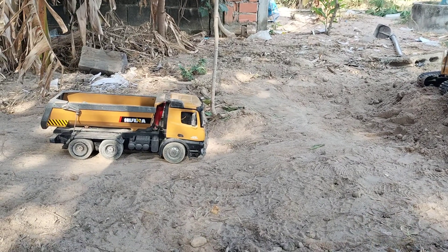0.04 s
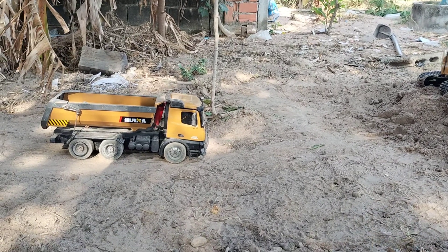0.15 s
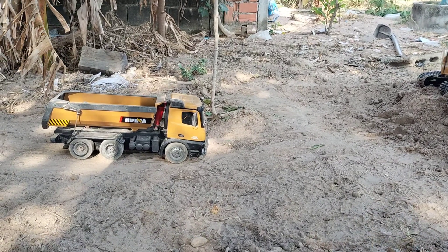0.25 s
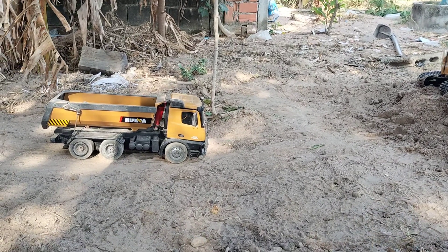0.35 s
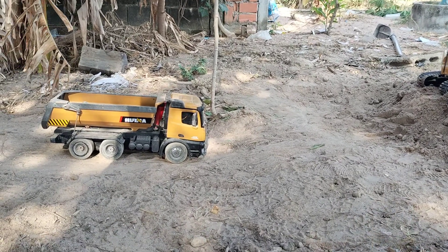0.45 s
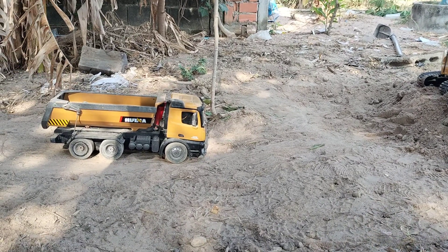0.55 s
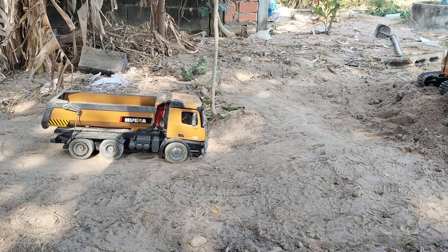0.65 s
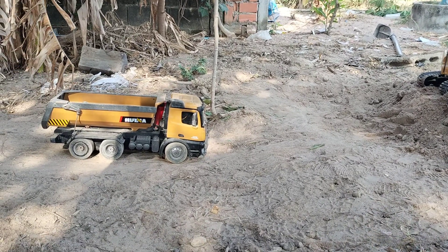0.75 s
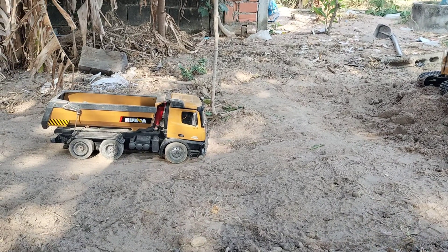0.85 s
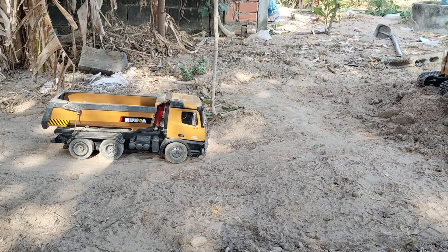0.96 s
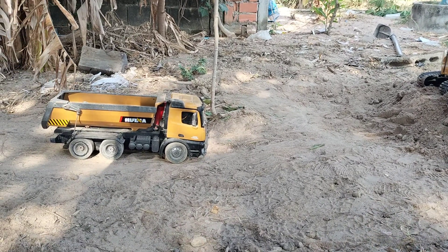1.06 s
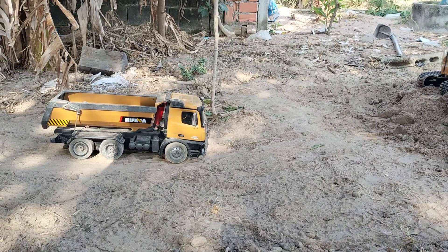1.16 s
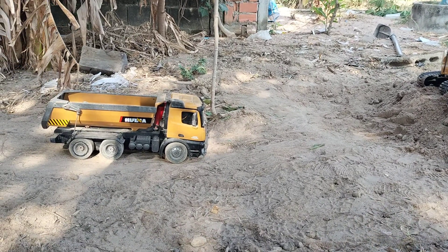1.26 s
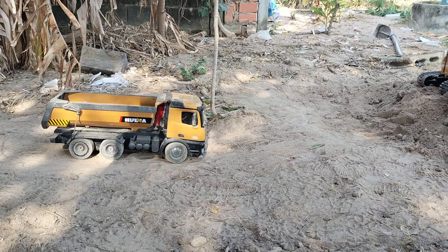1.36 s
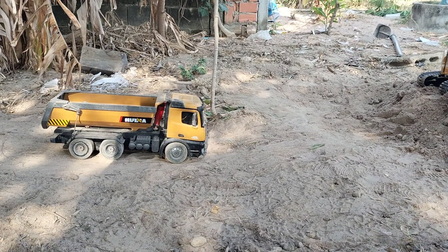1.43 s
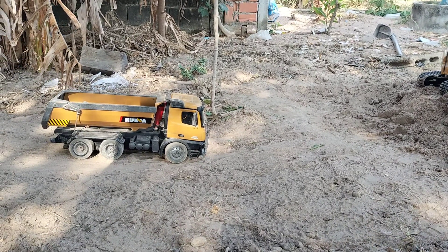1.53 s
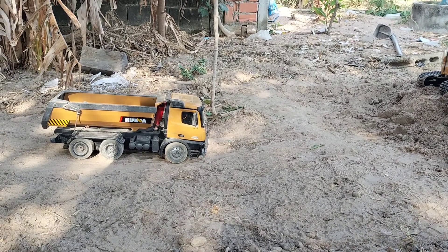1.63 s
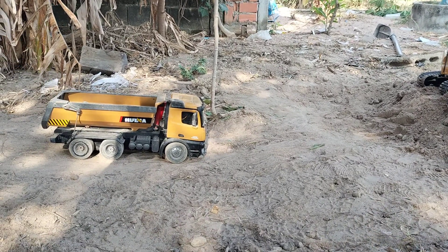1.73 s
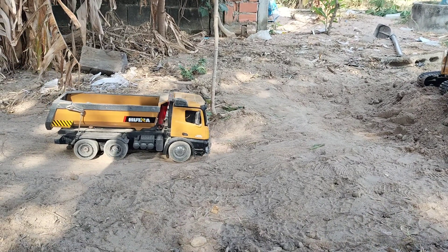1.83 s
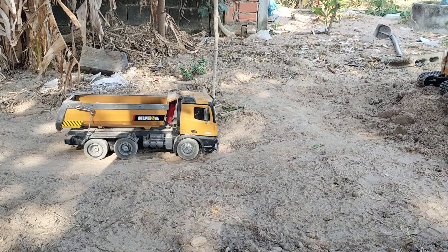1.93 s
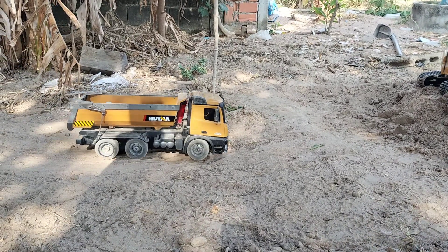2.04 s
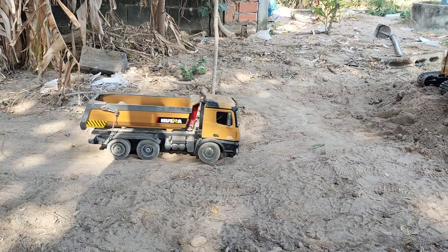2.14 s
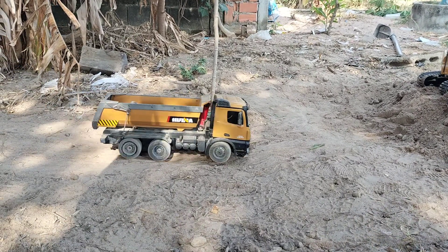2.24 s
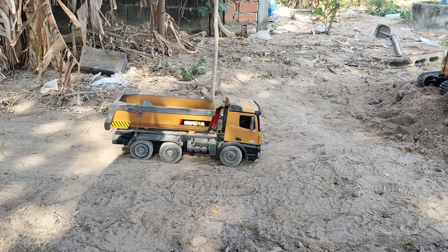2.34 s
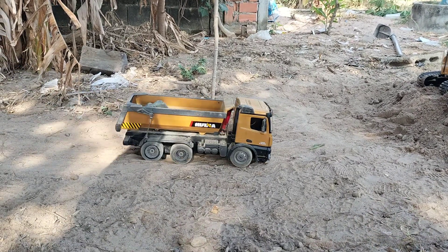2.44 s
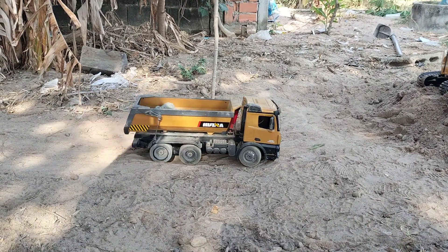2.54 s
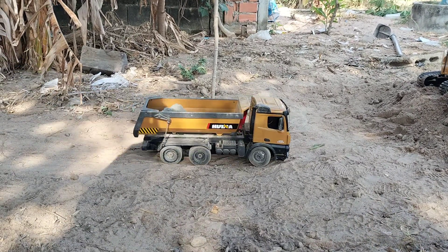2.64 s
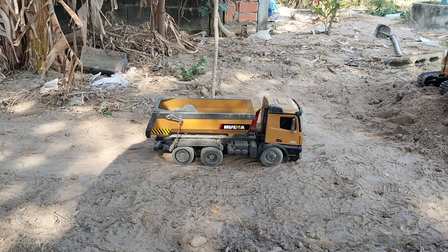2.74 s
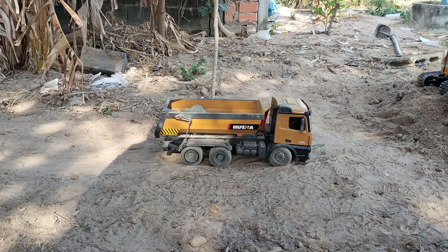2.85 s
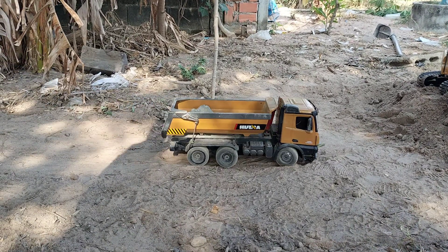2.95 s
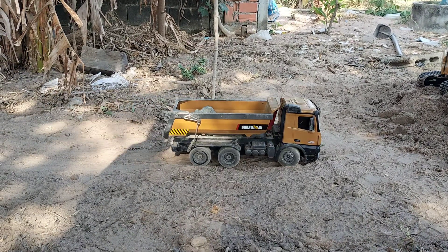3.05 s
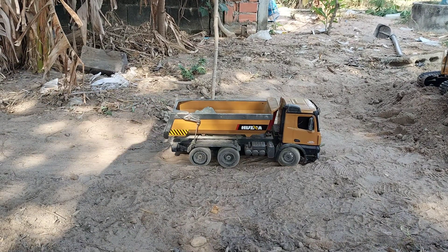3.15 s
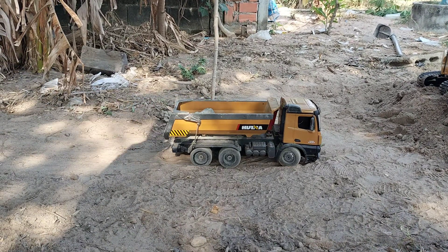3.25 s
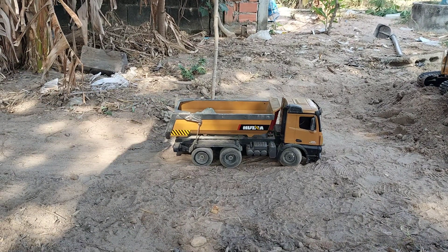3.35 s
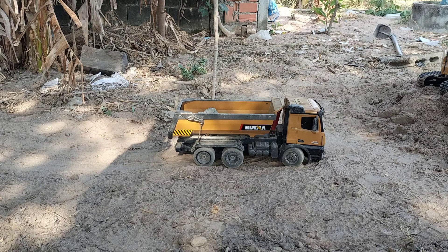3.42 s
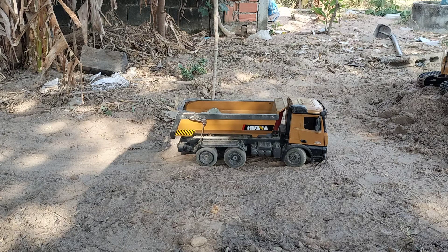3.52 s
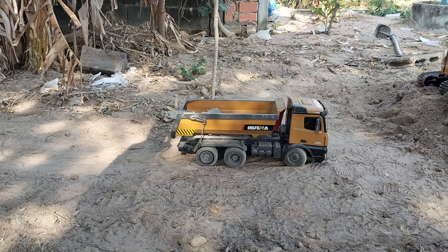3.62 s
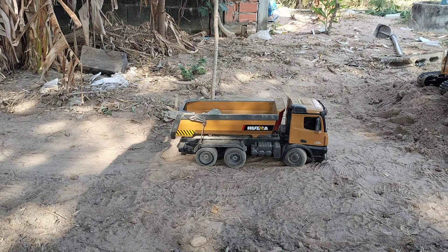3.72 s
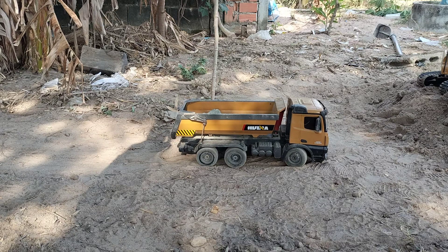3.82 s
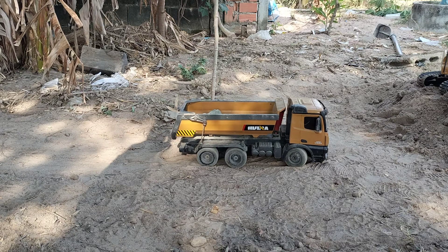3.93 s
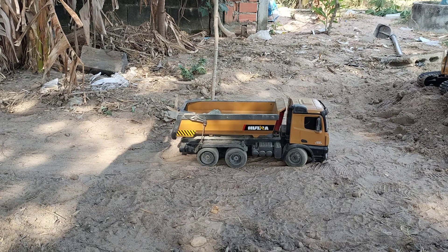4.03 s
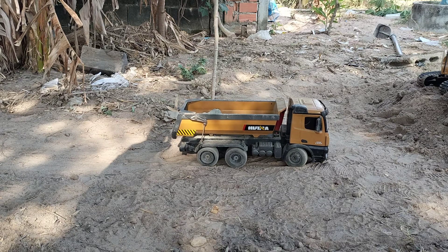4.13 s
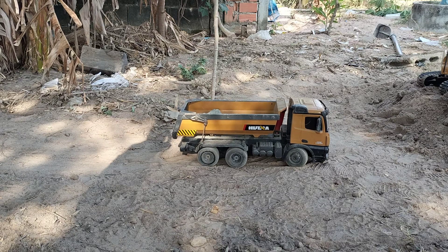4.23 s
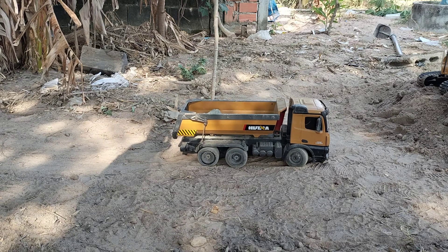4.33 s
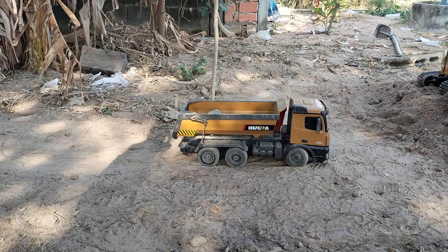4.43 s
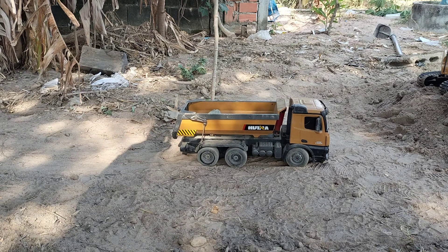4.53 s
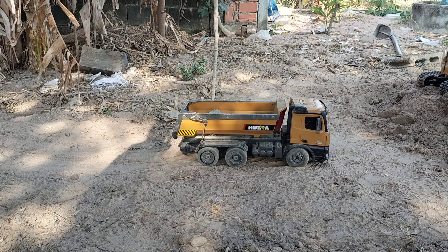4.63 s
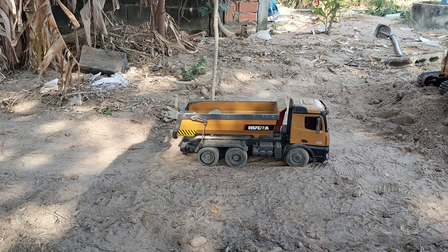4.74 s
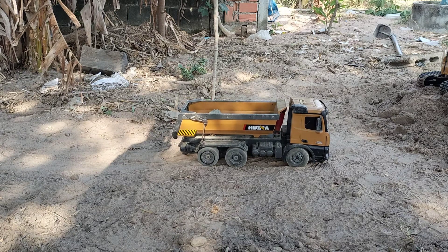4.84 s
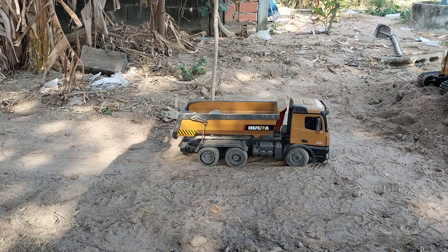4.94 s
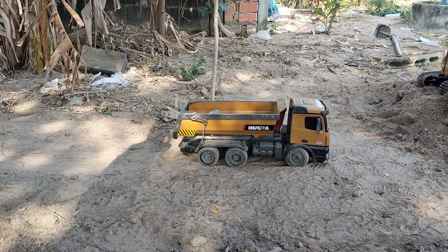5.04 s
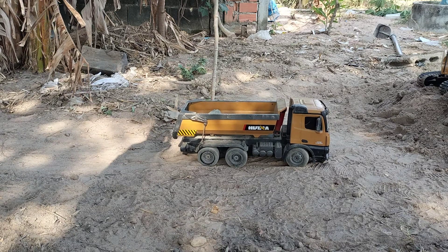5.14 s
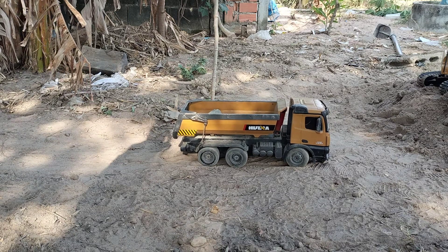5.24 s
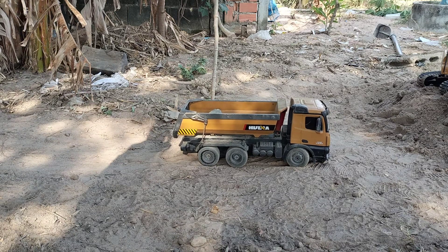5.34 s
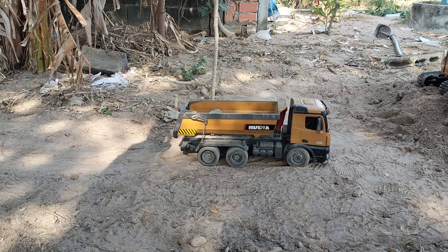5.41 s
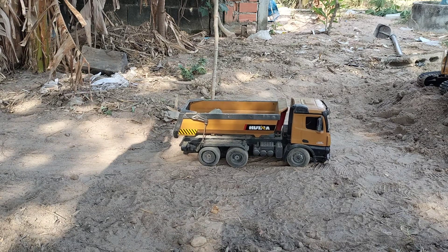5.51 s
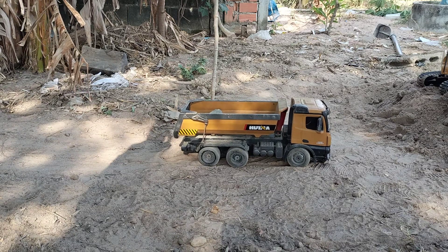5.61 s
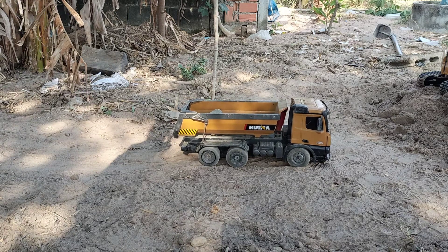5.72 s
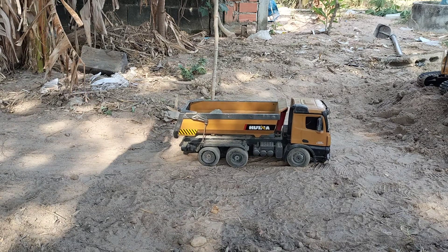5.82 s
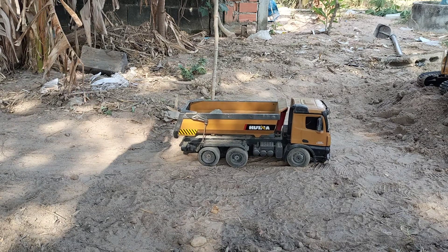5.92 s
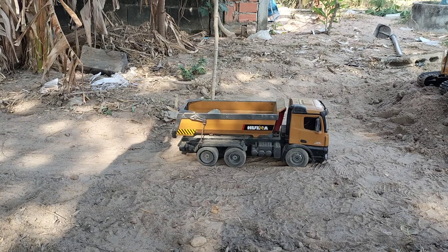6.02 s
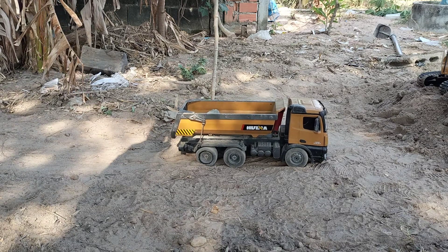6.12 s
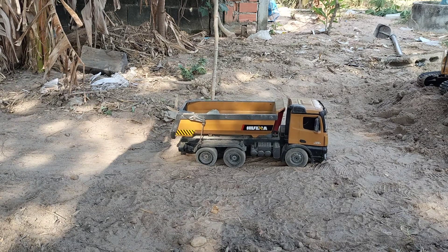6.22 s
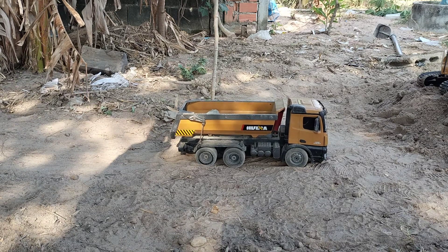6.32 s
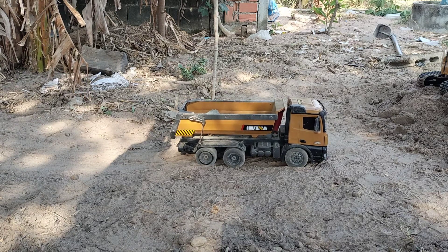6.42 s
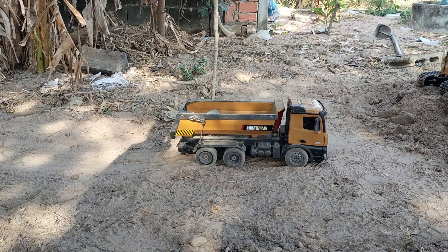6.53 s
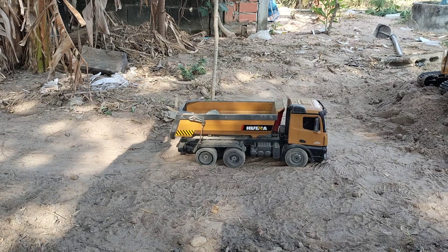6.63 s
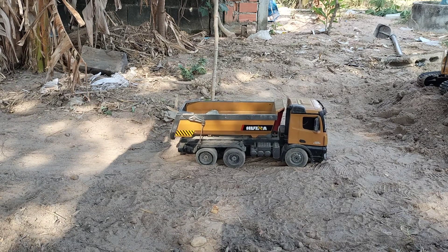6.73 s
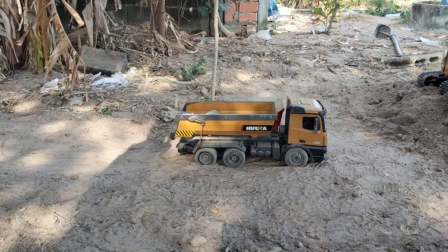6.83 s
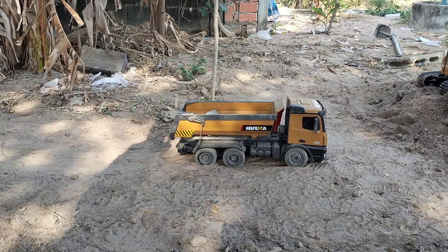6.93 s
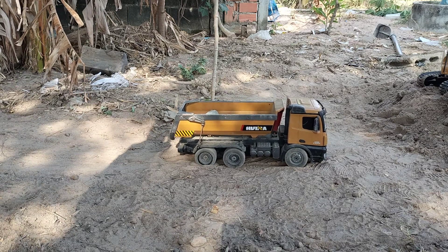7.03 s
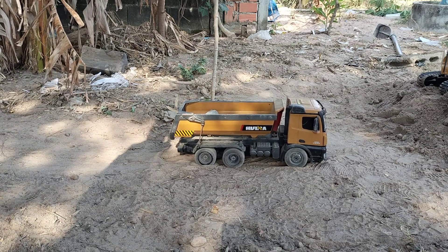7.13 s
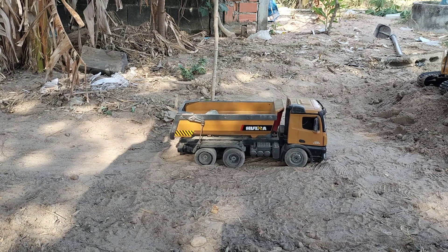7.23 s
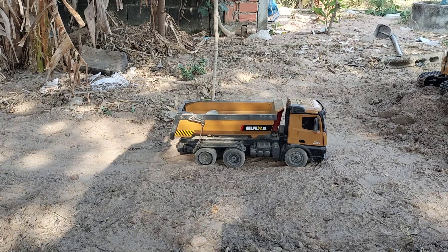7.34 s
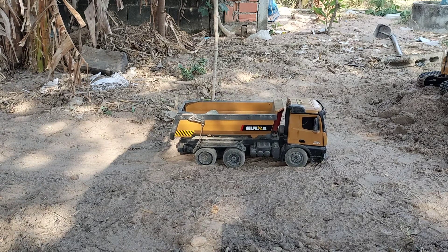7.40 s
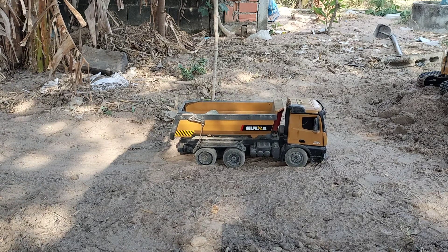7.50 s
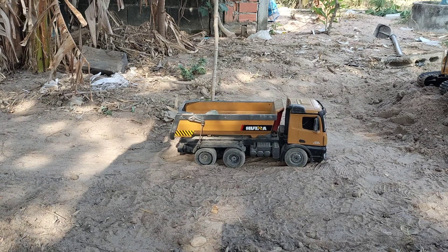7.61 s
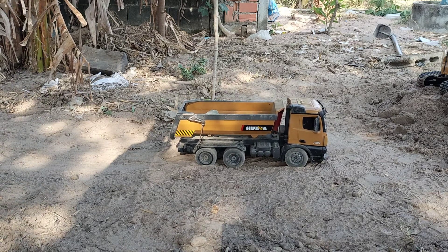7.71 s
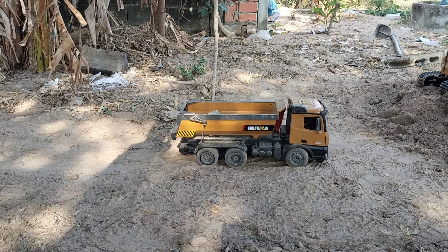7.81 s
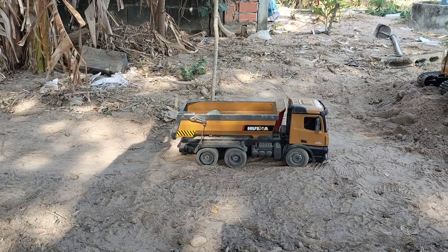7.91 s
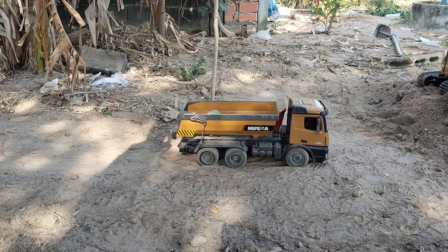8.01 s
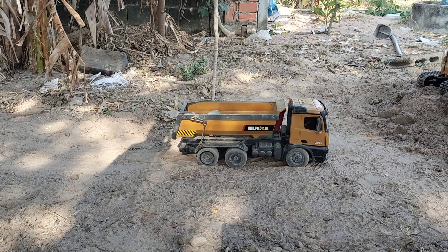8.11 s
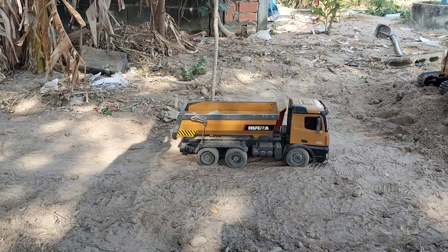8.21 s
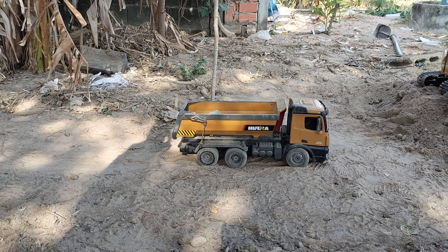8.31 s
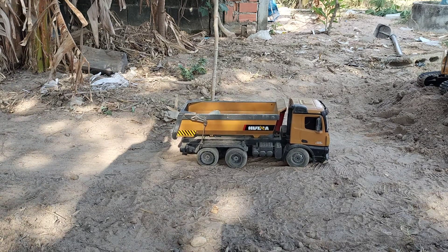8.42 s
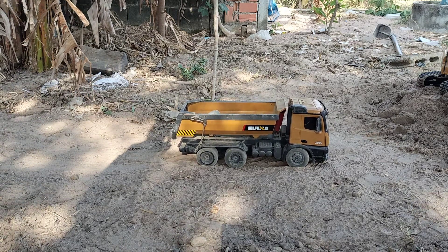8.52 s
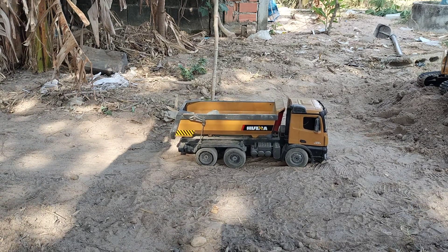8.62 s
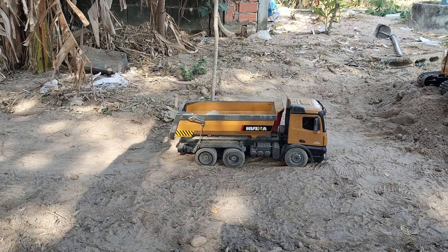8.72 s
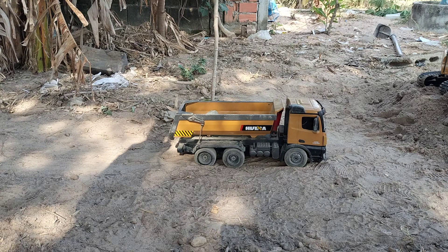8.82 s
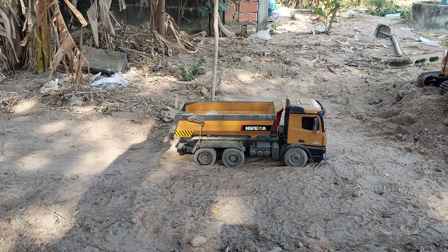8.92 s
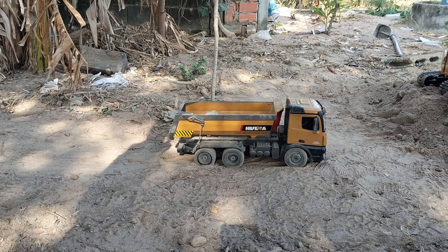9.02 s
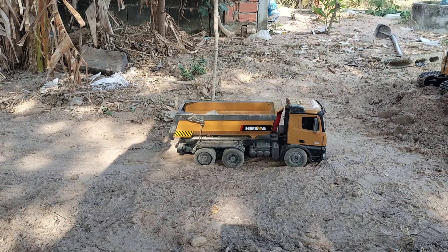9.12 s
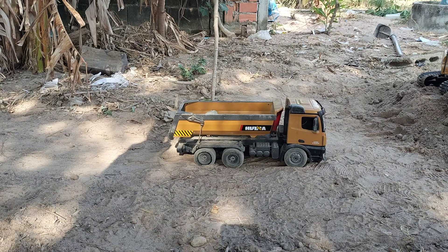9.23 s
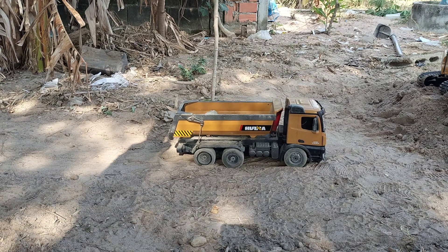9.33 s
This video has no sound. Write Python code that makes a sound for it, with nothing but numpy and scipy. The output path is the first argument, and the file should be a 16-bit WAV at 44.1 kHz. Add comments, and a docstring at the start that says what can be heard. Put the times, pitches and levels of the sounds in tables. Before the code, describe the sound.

After a quiet outdoor start with faint motor buzz and a dry plastic knock, a toy dump truck's gears burst into a rattling whirr. It rolls, then digs into dirt with short falling whines and hollow bed clatter. Shorter runs follow, split by brief pauses. Close stereo microphone, almost no echo, low open-air rumble.

```python
"""Loose plastic gears rattle and a pinion whirrs as a toy dump truck is driven over bare dirt in short runs.
Random tooth hits ring the gearbox; frayed mesh tones and falling whines follow the tooth rate, over a shaft hum.
Noise bursts ring the hollow tipper bed over ruts and knock the chassis; filtered noise snaps as grit.
A weakly driven motor buzzes in pulses. Behind lie weak echoes and shaped noise: open-air hush, rumble, gusts."""
import sys
import numpy as np
from scipy import signal
from scipy.fft import rfft, irfft
from scipy.io import wavfile
from scipy.ndimage import uniform_filter1d, map_coordinates

SR = 44100
rng = np.random.default_rng(int(sys.argv[2]) if len(sys.argv) > 2 else 0)


def materialize(psi):
    """Save the field psi as 16-bit PCM at rate SR to the path in sys.argv[1].

    A 1-D psi becomes a single channel; in a 2-D psi each row is a channel.
    """
    bounded = np.clip(np.atleast_2d(psi).T, -1, 1)
    quanta = np.round(bounded * 32767).astype(np.int16)
    wavfile.write(sys.argv[1], SR, quanta)


N = 412776
TAPS = 4096  # filter length and short-sound length [samples]
FREQ = np.maximum(np.arange(TAPS // 2 + 1) * SR / TAPS, 1)  # [Hz]
TIME = np.arange(N) / SR  # [s]
LEFT_RIGHT = np.array([[1], [-1]])  # opposed polarity in the two channels

# All table levels are relative: the functions that play them add trims.

# Gearbox resonances: (frequency [Hz], width [Hz], level at starting spot [dB], level at stopping spot [dB])
GEARBOX_RESONANCES = [(333, 37, 2.5, -9.5), (401.6, 57, -11, -3.5), (528, 160, -2, -6),
                      (728, 36.5, -1.5, 1.5), (851, 88, 3.5, -0.5), (1010, 89, 1.5, -0.5),
                      (1133, 55, -5, -2.5), (1247, 43, 1, -7), (1553, 270, -1, -5.5),
                      (1748, 174, -19, -4.5), (1965, 59, 0, -4.5), (2290, 217, -1.5, -5),
                      (2721, 30, -5, -6), (3540, 86, -15, -10.5), (3830, 190, -9, -12),
                      (4277, 160, -12, -13), (4660, 156, -13, -13.5), (5080, 130, -12, -21),
                      (6083, 66, -36, -20), (7720, 320, -18, -24.5), (8280, 190, -20.5, -21),
                      (8725, 144, -18, -19.5), (9480, 170, -29, -30), (10280, 270, -24, -29)]
# Broad gearbox colour under the resonances: (frequency [Hz], level [dB])
GEARBOX_COLOUR = [(100, -23.5), (250, -14), (650, -15), (1270, -11.5), (1650, -11), (2500, -15.5),
                  (2950, -19), (3300, -17.5), (4700, -32), (5500, -27), (6600, -29), (7100, -33),
                  (10000, -41.5), (11200, -38.5), (16000, -44)]
# Stereo width of the gears: (frequency [Hz], side minus mid [dB])
GEAR_WIDTH = [(110, -34), (380, -20), (700, -14), (1290, -10), (2380, -7.5), (4400, -4), (6500, -1),
              (8120, -6), (15000, 0)]


def gears(strain, level_db, sharp_db, load_db):
    """Random tooth hits ring the gearbox; load lifts its lows, sharpness its highs, and rolling turns its colour."""
    hits = [tooth_hits(rate_hz=3500, scatter_db=2) + skips(strain) for _ in range(2)]
    angle = colour_turn() * np.pi / 2
    modes = np.array(GEARBOX_RESONANCES)
    spots = ((np.cos(angle), modes[:, [0, 1, 2]], 4.0),  # share, resonances, broad colour level [dB]
             (np.sin(angle), modes[:, [0, 1, 3]], 2.5))
    out = 0
    for share, heard, colour_db in spots:
        shell = body(GEARBOX_COLOUR, heard, colour_db)
        mid, side = (ring(h, shell) for h in hits)
        # Reference levels, so that each range can be balanced by itself.
        load_ref = band(mid, 300, 700).std()
        core_ref = band(mid, 1000, 2000).std()
        sharp_ref = band(mid, 3000, 9000).std()
        low, rest = split(stereo(mid, side, GEAR_WIDTH), 695)
        middle, high = split(rest, 2340)
        balanced = undb(load_db) * low / load_ref
        balanced = balanced + undb(-3.0) * middle / core_ref
        balanced = balanced + undb(sharp_db - 1.9) * high / sharp_ref
        out = out + share * balanced
    low, high = split(out * undb(level_db), 4400)
    return low * undb(1.44 * walk(70)) + high  # the loose gear train shakes the shell unevenly


def tooth_hits(rate_hz, scatter_db):
    """Impacts of random timing, polarity and size at a steady average rate."""
    struck = rng.random(N) < rate_hz / SR
    return struck * rng.choice([-1, 1], N) * undb(scatter_db * rng.standard_normal(N))


def skips(strain, rate_hz=100, size_db=12, scatter_db=3):
    """Under strain a tooth now and then jumps and lands with a hard tick; the rate grows as strain squared."""
    ticks = rng.random(N) < rate_hz * np.maximum(strain, 0) ** 2 / SR
    return ticks * undb(size_db + scatter_db * np.clip(rng.standard_normal(N), -2, 1))


# Tones of the gear train: (multiple of the tooth rate [ratio], level [dB])
MESH_TONES = [(.365, -8.5), (.74, -7.5), (1.002, 0), (2, -18.5)]


def pinion(turns, level_db, unloaded):
    """Rough mesh tones with shaft sidebands; the phase slips in the backlash and chatters when unloaded."""
    shaft = 0.27 * np.sin(2 * np.pi * turns / 23.0)  # phase swings [rad]

    def mesh(ratio):
        """One mesh tone with wandering phase and level."""
        backlash = 0.71 * walk(600)
        chatter = 3.0 * unloaded * walk(260)
        phase = 2 * np.pi * ratio * turns + backlash + chatter + 2.12 * walk(70) + shaft
        return np.sin(phase) * undb(3.3 * walk(130))

    tones = sum(undb(db) * mesh(ratio) for ratio, db in MESH_TONES)
    opposed = undb(-5.0) * LEFT_RIGHT * mesh(1)
    return undb(level_db - 8.5) * (tones + opposed)


def squeal(turns, level, sideband_db=-9):
    """With the teeth pressed to one flank the mesh tone stands out, slightly frayed, over a lower sideband."""
    phase = 2 * np.pi * turns + .6 * walk(600)
    fray = undb(2.5 * walk(200) - 1)
    sideband = np.sin(.74 * phase + walk(200))
    return level * fray * (np.sin(phase) + undb(sideband_db) * sideband)


# Motor hum while the truck first rolls: (time [s], shaft rate before waver [Hz], level [dB])
HUM_PATH = [(1.68, 160.1, -52), (1.78, 158.3, -43.5), (1.82, 160.6, -40), (1.865, 172.6, -38),
            (1.93, 162.7, -39), (1.99, 157.8, -49), (2.05, 165.3, -36.5), (2.12, 158.1, -46),
            (2.23, 145, -51), (2.29, 150.8, -46), (2.35, 152.4, -46), (2.42, 148.6, -44.5),
            (2.48, 145.7, -43), (2.53, 143, -43.5), (2.63, 147.5, -41.5), (2.7, 148.5, -58)]
# Shaft overtones: (multiple of the shaft rate [ratio], level at starting spot [dB], level at stopping spot [dB])
HUM_OVERTONES = [(2, -14.5, -25), (3, -2.5, -8), (4, -5.5, -18), (5, -11, -26), (6, -27, -1.5), (9, -9, -4),
                 (10, -11, -8), (13, -11, -21), (14, -9, -10), (15, -12, 4), (16, -14, -3), (17, -21, 0),
                 (18, -6, -3), (22, -4, -9), (24, -10, -22)]


def hum(twist=0.028, waver=0.00295, flutter_db=3):
    """Under a light, even load the unbalanced shaft sings overtones whose balance turns as the truck rolls by."""
    hz, db = curves(HUM_PATH)
    phase = 2 * np.pi * np.cumsum(hz * (1 + waver * walk(30))) / SR
    way = colour_turn()
    wobble = twist * walk(150)  # the shaft twists to and fro, which frays the high overtones most
    tones = 0
    for order, first_db, last_db in HUM_OVERTONES:
        level = undb(first_db + (last_db - first_db) * way + flutter_db * walk(22.0))
        tones = tones + level * np.sin(round(order) * (phase + wobble) + .5 * walk(45))
    return tones * undb(db) * (TIME > HUM_PATH[0][0]) * (TIME < HUM_PATH[-1][0])


SPIN_UP_S, KICK = .06, 0.1  # rise to full speed [s]; share of full speed at the first jump into life
SAG_HZ_PER_S = 60  # the motor tires while the throttle is held
SLOW_DULL_DB, SLOW_PITCH_DROP = 12, .75  # near standstill: softer strikes; share by which the whirr is lower
FREE_LOAD_DB, COAST_LOAD_DB = -11, 11.5  # chassis shake turning freely; rise as the wheels drag the gears down
COAST_POWER, COAST_PITCH_S = 1.99, .06  # gear noise against coasting speed; pitch fall time constant [s]
RUN_DOWN_WHIRR_DB = 8  # the whirr stands out from the gears on running down
WHIRR_LATE_DB, WHIRR_LATE_S = 12, 0.037  # the whirr starts this far down and builds up after the gears
# Runs with the throttle held: (start [s], release [s], gear level [dB], tooth sharpness [dB],
# whirr over gears [dB], starting tooth rate before strain and judder [Hz], coasting time [s])
THROTTLE_RUNS = [(1.405, 4.113, -39.5, -1.5, 7.5, 2346, 0.25), (4.534, 4.659, -49, -1, -11, 2070, 0.071),
                 (4.885, 5.222, -36, -7, 1.5, 2385, 0.12), (5.565, 6.905, -37.5, -4.5, 6, 2404, 0.11),
                 (7.285, 7.959, -37.5, -4, -1, 2353, 0.17), (8.125, 9.402, -36.5, -6, 3, 2429, 0.093)]


def throttle():
    """Runs spin up, sag and coast under friction: gear level, sharpness, load, whirr (all dB), tooth rate (Hz)."""
    controls = np.zeros((5, N))
    controls[0] = -120  # silent before the first run
    for start, release, db, sharp_db, whirr_db, hz, coast_s in THROTTLE_RUNS:
        on = slice(int(start * SR), N)
        held = np.maximum(TIME[on] - start, 0)
        released = np.maximum(TIME[on] - release, 0)
        spin = np.minimum(KICK + held / SPIN_UP_S, 1)
        coast = np.clip(1 - (TIME[on] - release) / coast_s, 0, 1)
        gear_db = db + 20 * np.log10(spin * coast ** COAST_POWER + 1e-5)
        tooth_db = sharp_db - SLOW_DULL_DB * (1 - spin * coast)
        load_db = FREE_LOAD_DB + COAST_LOAD_DB * (1 - coast)
        late_db = WHIRR_LATE_DB * np.exp(-held / WHIRR_LATE_S)
        whirr_over_db = whirr_db - late_db + RUN_DOWN_WHIRR_DB * np.sqrt(1 - coast)
        speed = spin * np.exp(-released / COAST_PITCH_S)
        rate = (hz - SAG_HZ_PER_S * held) * (1 - SLOW_PITCH_DROP * (1 - speed))
        controls[:, on] = (gear_db, tooth_db, load_db, whirr_over_db, rate)
    return controls


def run_down(db=-37, late_s=0.031, sing_s=0.0077):
    """Level of the falling whine just after each throttle release, in step with the gear level of the run."""
    level = 0
    for run in THROTTLE_RUNS:
        swell = np.exp(-((TIME - run[1] - late_s) / sing_s) ** 2 / 2)
        level = level + undb(db + run[2] - THROTTLE_RUNS[0][2]) * swell
    return level


# Ground under the tyres: (start [s], end [s], strain [1 = tyres dig in, 0 = ordinary, below 0 = rolling lightly])
GROUND_STRAIN = [(1.501, 1.689, -0.31), (1.71, 2.196, 0.21), (2.25, 2.667, -0.15), (2.69, 2.99, 0.99),
                 (2.99, 3.231, -0.2), (3.25, 4.449, 0.98), (4.99, 5.354, 0.66), (5.78, 5.9, 0.18),
                 (5.93, 6.15, -0.2), (6.17, 6.259, 0.38), (6.42, 6.68, 0.37), (6.76, 6.98, 0.4),
                 (7.42, 8.122, 0.87), (8.17, 8.46, 0.58), (8.46, 8.6, 0.42), (8.78, 9.031, 0.27)]


def ground_strain():
    """Strain that the ground puts on the drive."""
    return stretches(GROUND_STRAIN)


BOG_DB, BOG_LATE_S, BOG_S = -1, 0.021, 0.0048  # gear dip after a slip falling at 20 kHz/s; its delay, half length
# A wheel loses grip: (time [s], whine pitch [Hz], pitch fall [Hz/s], whine level [dB])
WHEEL_SLIPS = [(2.656, 2500, 5000, -36), (2.985, 2604, 14000, -32), (3.04, 2352, 12000, -42),
               (3.167, 2373, 9980, -44), (3.225, 2433, 26200, -27), (3.289, 2516, 15030, -33),
               (3.346, 2850, 20100, -34), (3.412, 3080, 20300, -39), (3.45, 2600, 31300, -33),
               (3.555, 2620, 29560, -33), (3.613, 2687, 18100, -32), (3.729, 2570, 27760, -33),
               (3.941, 2480, 20100, -32), (4.045, 2446, 19900, -36), (4.106, 2690, 16960, -31),
               (5.02, 2504, 18100, -33), (6.03, 2478, 8000, -40), (7.347, 2453, 7950, -35.5),
               (7.509, 2520, 22050, -34), (7.592, 2606, 24050, -32), (7.636, 2142, 14100, -34),
               (7.685, 2667, 17060, -30.5), (7.736, 2333, 25900, -32), (7.819, 2676, 18040, -33),
               (7.923, 2590, 16230, -34), (8.203, 2474, 8000, -34), (8.32, 2480, 8000, -31),
               (8.466, 2537, 7880, -31)]


def slips(hz, glide_s=.024, sing_s=0.0082):
    """At each slip the motor races and is dragged down: tooth rate, whine level, dip of the gears in dB."""
    hz, whine, bog_db = hz.copy(), np.zeros(N), np.zeros(N)
    for s, slip_hz, fall, db in WHEEL_SLIPS:
        near = slice(int(s * SR) - TAPS, int(s * SR) + TAPS)
        t = TIME[near] - s
        hz[near] += np.exp(-(t / glide_s) ** 4) * (slip_hz - fall * t - hz[near])
        whine[near] += undb(db) * np.exp(-(t / sing_s) ** 2 / 2)
        bog_db[near] += BOG_DB * fall / 20000 * np.exp(-((t - BOG_LATE_S) / BOG_S) ** 2 / 2)
    return hz, whine, bog_db


# The pinion seats well and sings out: (start [s], end [s], whirr gain [dB], clean whine level [dB])
PINION_SINGS = [(1.543, 1.652, 7.5, -46), (2.2, 2.4, -1, -47), (2.4, 2.661, -3, -41.5),
                (2.989, 3.197, 5, -39.5), (5.68, 5.919, 2, -40), (6.2, 6.319, 0.5, -40),
                (6.42, 6.66, 4.5, -39.5), (8.49, 8.68, 4.5, -39), (9.1, 9.2, 1.5, -44), (9.3, 9.4, 1, -43)]


def sings():
    """Gain of the rough whirr in dB and level of the clean whine while the pinion seats well."""
    whirr_db = stretches([(a, b, db) for a, b, db, _ in PINION_SINGS])
    whine = stretches([(a, b, undb(db)) for a, b, _, db in PINION_SINGS])
    return whirr_db, whine


def judder(rate_hz=23.1, depth=0.013, unsteady=0.00896):
    """The springy drive train wobbles the speed: a loose shudder that swells and fades, plus chance."""
    shudder = np.sin(2 * np.pi * rate_hz * TIME + 2 * walk(5)) * (1 + .5 * walk(3))
    return depth * shudder + unsteady * walk(40)


def colour_turn(start_s=2.05, stop_s=2.49):
    """Turn of the drive's colour from that of the starting spot to that of the stopping spot, 0-1."""
    return ramp(start_s, stop_s - start_s)


# The truck rolls from the left to the middle: (time [s], lag of the right channel [ms])
RIGHT_LAG = [(1.6, 0.15), (1.8, 0.13), (2.0, 0.11), (2.2, 0.079), (2.5, 0.035), (2.9, 0.026), (3.5, 0.023)]


def ports(x):
    """Drive sound reaches the right microphone port late; the lag shrinks as it rolls toward the middle."""
    lag_ms, = curves(RIGHT_LAG)
    right = map_coordinates(x[1], [(TIME - lag_ms / 1000) * SR], order=3, mode="nearest")
    return np.array([x[0], right])


# Left-right balance of the drive: (frequency [Hz], left minus right [dB])
DRIVE_BALANCE = [(60, 1), (110, -2), (200, 1), (380, 0), (700, 0.5), (1290, -0.5), (2380, -3.5),
                 (4400, -1.5), (8120, 2), (15000, -1)]


def balance(drive):
    """Opposite filters tilt the drive between left and right by frequency."""
    tilt = np.sqrt(gains(DRIVE_BALANCE))
    return np.array([ring(drive[0], tilt), ring(drive[1], 1 / tilt)])


def drive_train(free_whirr_db=-6):
    """Gears, pinion and whines follow throttle, strain and slips; the hum keeps its own shaft-rate path."""
    level_db, sharp_db, load_db, whirr_db, hz = throttle()
    strain = ground_strain()
    digging, light = np.maximum(strain, 0), np.maximum(-strain, 0)
    # Digging wheels hop clear of the ground, so the motor runs 6 % faster at full strain.
    hz, slip_whine, bog_db = slips(hz * (1 + .06 * strain + judder()))
    sing_db, seated_whine = sings()
    level_db = level_db + bog_db - digging + 0.98 * walk(12)
    turns = np.cumsum(hz) / SR  # teeth passed
    # The whirr is weaker at the starting spot and under strain.
    whirr_level_db = level_db + whirr_db + free_whirr_db * (1 - colour_turn()) - 5.5 * strain + sing_db
    whirr = pinion(turns, whirr_level_db, light)
    rattle = gears(strain, level_db, sharp_db + strain, load_db + 12.5 * digging)
    whine = squeal(turns, slip_whine + seated_whine + run_down())
    return balance(ports(rattle + whirr + whine + hum()))


RATTLE_S, REBOUND_S = 0.011, .0135  # loose-part decay at 0 dB treble; the bed drops back after each blow
RATTLE_DOUBLING_DB = 20  # a blow with this much less treble rattles twice as long
# Tipper bed resonances: (frequency [Hz], width [Hz], level [dB])
BED_RESONANCES = [(155, 8.7, -12), (207, 34, 4), (380, 20, -6), (538.5, 18, 6.5), (637, 37, -7),
                  (854, 78, -0.5), (1660, 82, -10), (2460, 75, -30)]
# Broad tipper bed colour: (frequency [Hz], level [dB])
BED_COLOUR = [(65, -66), (110, -19), (620, 3), (884, 0), (1340, -4), (1790, 1.5), (2400, -5.5), (2900, -8),
              (4680, -13), (7250, -26), (8560, -24), (9500, -28), (16000, -34)]
# The bed clatters over a rut: (time [s], level [dB], treble [dB], boom [dB], rebound against first blow [dB])
BED_JOLTS = [(2.186, -10.5, -22, -22, -30), (2.212, -23, -26, -17, -0.5), (2.687, -27, -17, -7, -18),
             (2.76, -12.5, -16, -19, -20), (2.823, -12.5, -11, -10, -32), (2.883, -15, -12.5, -11, -9),
             (2.941, -21, -13, -4, -0.5), (3.267, -20, -25, -7, -6.5), (3.329, -15, -13, -9, -11),
             (3.398, -11.5, -13, -12, -21), (3.605, -22.5, 0, -15, -21), (3.652, -19, -3.5, -15, -2.5),
             (3.709, -18, -11, -7, -19), (3.772, -15.5, -5.5, -2.5, -3), (3.826, -16.5, 15, -6, -29),
             (3.977, -18.5, -12, -9, 4.5), (4.035, -19.5, -8, -12, -18), (4.16, -33, -36, -15, -17),
             (4.196, -22.5, -8, -35, -28), (4.606, -29, -23, -30, -7), (5.004, -22, -13, -33, -13),
             (5.061, -19, -8, -13, -4.5), (5.103, -26, -20, -12, -15), (5.124, -13, -14, -14, -5.5),
             (5.183, -14.5, -11, -6, -25), (5.235, -14, -12, -4.5, -11), (7.467, -12, -12.5, -15, -13),
             (7.507, -21, -15, -10, -14), (7.548, -15, -5.5, -6, -0.5), (7.624, -24, -19, -5, -10),
             (7.721, -23, 6, -1, -6), (7.781, -16, -11, -6, -4.5), (7.844, -18.5, -8, -15, -14),
             (7.884, -22.5, -9, -11, -20), (7.903, -19.5, -13, -4, -10), (7.957, -24.5, -21, -10, -23),
             (8.002, -24, -12, -7, 8), (8.038, -29.5, -1, 2, -3)]


def jolts(rise_s=0.00081, thump=0.24, shove_s=0.0005):
    """A soft shove through the tyres, loose parts that chatter and die away, and one rebound ring the bed."""
    out, t = np.zeros((2, N)), TIME[:TAPS * 2]
    for s, db, treble_db, boom_db, rebound_db in BED_JOLTS:
        decay_s = RATTLE_S * 2 ** (-treble_db / RATTLE_DOUBLING_DB)
        pushes = np.zeros((2, len(t)))
        for late, size in ((0, 1), (int(REBOUND_S * SR), undb(rebound_db))):
            push = rng.uniform(-0.99, 1, (2, len(t))) * (rng.random((2, len(t))) < 4000 / SR)
            push *= (1 - np.exp(-t / rise_s)) * np.exp(-t / decay_s)
            push[0] += thump * t / shove_s * np.exp(-t / shove_s)
            pushes[:, late:] += size * push[:, :len(t) - late]
        strength = undb(db + 19.5) * np.hypot(1, undb(rebound_db))
        clatter = blow(pushes, BED_COLOUR, BED_RESONANCES, min(treble_db, 3) + 8.0,
                       min(boom_db + 1.5, 0), between_db=-3.0, detune=0.037)
        add(out, s + 0.000988, strength * clatter)
    return out


# Chassis resonances: (frequency [Hz], width [Hz], level [dB])
CHASSIS_RESONANCES = [(256, 63, -1.5), (340, 18, 3), (383, 26, -3), (540, 30, 3.5), (667, 43, -0.5),
                      (782, 48, 3), (1260, 110, -0.5), (1750, 320, -0.5), (2410, 130, -1.5),
                      (4160, 200, -11.5)]
# Broad chassis colour: (frequency [Hz], level [dB])
CHASSIS_COLOUR = [(65, -40), (180, -16), (700, -2), (1050, -11), (1500, -16), (2600, -6), (3100, -18),
                  (5000, -21), (8000, -35.5), (16000, -31)]
# The chassis knocks dryly, at rest or while driving: (time [s], level [dB], treble [dB])
CHASSIS_KNOCKS = [(0.091, -41.5, -13), (1.185, -41, -15), (1.199, -38, -18), (1.297, -19.5, -2),
                  (2.893, -20, -7), (3.829, -17, 6), (3.977, -29, -2), (4.177, -29, -21), (4.309, -32, -11),
                  (4.352, -42.5, -20), (4.405, -29, -11), (4.593, -32.5, -4), (5.29, -37.5, 5),
                  (6.983, -40.5, -25), (7.07, -24, -18.5), (7.101, -40.5, -16), (7.142, -43.5, -17),
                  (8.002, -29.5, -10)]


def knocks(contact_s=0.0012, tail_db=-25, tail_s=0.012):
    """The chassis knocks dryly, at rest or along with hard jolts: a short, rough contact, then a faint buzz."""
    out, t = np.zeros((2, N)), TIME[:TAPS]
    contact = t / contact_s * np.exp(-t / contact_s) + undb(tail_db) * np.exp(-t / tail_s)
    for s, db, treble_db in CHASSIS_KNOCKS:
        push = rng.standard_normal((2, TAPS)) * contact
        knock = blow(push, CHASSIS_COLOUR, CHASSIS_RESONANCES, treble_db + 10.0,
                     boom_db=-2, between_db=0.5, detune=0.022)
        add(out, s + 0.0033, undb(db + 20) * knock)
    return out


# Stereo width of blows, grit and buzz: (frequency [Hz], side minus mid [dB])
TRUCK_WIDTH = [(60, -35), (110, -42), (200, -19), (380, -16.5), (700, -11.5), (1290, -6), (2380, -7),
               (4400, 0), (8120, 0.5), (15000, 2)]


def blow(push, colour, modes, treble_db, boom_db, between_db, detune):
    """A push rings a shell; each blow lands elsewhere, favours other resonances and shifts them a little."""
    chance = rng.standard_normal((len(modes), 2))
    varied = [(hz * (1 + detune * shift), width, db + 2 * favour)
              for (hz, width, db), (shift, favour) in zip(modes, chance)]
    shell = body(colour, varied, between_db)
    boom, rest = split(stereo(ring(push[0], shell), ring(push[1], shell), TRUCK_WIDTH), 320)
    middle, treble = split(rest, 845)
    parts = ((boom, boom_db), (middle, 0), (treble, treble_db))
    sound = sum(undb(db) * part / np.linalg.norm(part) for part, db in parts)
    return sound / np.linalg.norm(sound[0])


# Colour of the grit: (frequency [Hz], level [dB])
SNAP_COLOUR = [(500, -18), (1800, 1), (4200, 0.5), (6500, -11.5), (10000, -17.5), (16000, -18)]
# Grit snaps: (time [s], level [dB])
GRIT_SNAPS = [(0.3067, -56), (0.514, -48), (0.921, -49), (0.935, -53), (1.298, -54), (3.6105, -27.5),
              (3.6515, -24), (3.662, -27), (3.772, -30), (3.8306, -35), (3.9777, -30), (4.195, -28.5),
              (5.142, -20.5), (5.158, -26), (5.1856, -29), (7.025, -51), (7.06, -36), (7.548, -28),
              (7.624, -24.5), (7.8853, -27.5)]


def grit(snap_s=.002, tail_db=-24, tail_s=0.069):
    """Grains of dirt crack under the tyres and flick against the plastic: noise with a sharp decay and faint tail."""
    out, t = np.zeros((2, N)), TIME[:TAPS]
    decay = np.exp(-t / snap_s) + undb(tail_db) * np.exp(-t / tail_s)
    for s, db in GRIT_SNAPS:
        crack = rng.standard_normal((2, TAPS)) * decay
        snap = stereo(*(ring(c, gains(SNAP_COLOUR)) for c in crack), TRUCK_WIDTH)
        add(out, s, snap * undb(db + 10.0) / np.abs(snap).max())
    return out


# Colour of the motor buzz: (frequency [Hz], level [dB])
BUZZ_COLOUR = [(150, -40), (250, -10.5), (540, -3), (640, -13), (740, -3), (900, -7), (1070, 1),
               (1220, -2.5), (1600, 0), (1900, -1.5), (2200, -8.5), (2550, -11), (2900, -20), (3520, -24),
               (6670, -28), (14000, -46)]
# Bursts of motor buzz: (start [s], end [s], level [dB], whine against buzz [dB])
MOTOR_BUZZES = [(-0.02, 0.02, -47, -14), (0.024, 0.038, -53, -14), (0.049, 0.067, -47, -10),
                (0.074, 0.097, -50, -14), (0.116, 0.13, -53, -10), (0.136, 0.153, -55, -10),
                (1.41, 1.45, -50.5, -10), (4.479, 4.687, -45, -17), (4.707, 4.757, -49, -17),
                (4.893, 4.912, -50, -14), (5.348, 5.385, -48.5, -14), (5.399, 5.456, -61.5, -15),
                (6.977, 7.041, -60, 0), (7.287, 7.31, -52, -12)]


def buzz(attack_s=0.0036, release_s=0.0097, pulse_hz=248.5, whine_hz=1630):
    """A weakly driven motor buzzes in pulses: the steering servo, or the drive motor just before it turns."""
    pulses = undb(1.5 * np.sin(2 * np.pi * pulse_hz * TIME + walk(60)))
    turns = TIME * 1500
    eccentric = undb(-0.5 * (np.sin(2 * np.pi * turns / 46) + np.sin(2 * np.pi * turns / 22.0)))
    hits = [pulses * eccentric * tooth_hits(rate_hz=3500, scatter_db=0.5) for _ in range(2)]
    rattle = stereo(*(ring(h, gains(BUZZ_COLOUR)) for h in hits), TRUCK_WIDTH)
    rattle = rattle / rattle.std()
    whine = np.sin(2 * np.pi * whine_hz * TIME + .8 * walk(150))
    rattle_level, whine_level = 0, 0
    for start, end, db, whine_db in MOTOR_BUZZES:
        level = undb(db) * ramp(start, attack_s) * np.exp(-np.clip(TIME - end, 0, 1) / release_s)
        rattle_level = rattle_level + level
        whine_level = whine_level + level * undb(whine_db)
    return (rattle * rattle_level + whine * whine_level) * undb(3.0 * walk(40))


def yard(x, echo_db=-23, t60=0.24):
    """Weak, dull scatter from the ground, plants and a wall: a decaying noise tail."""
    t = TIME[:SR // 2]
    noise = band(rng.standard_normal((2, len(t))), 270, 6600)
    scatter = noise * np.exp(-np.log(1000) * t / t60) * (t > .006)
    echo = signal.oaconvolve(x, scatter / np.linalg.norm(scatter[0]), axes=1)[:, :N]
    return x + undb(echo_db) * echo


# Colour of the open air: (frequency [Hz], level [dB])
AIR_COLOUR = [(12, -49), (20, -12), (43, -7.5), (65, -2), (130, -13.5), (187, -26.5), (319, -35),
              (367, -26.5), (410, -37.5), (698, -34.5), (1090, -45), (2550, -44), (3050, -52.5),
              (4180, -51), (6910, -64.5), (16000, -62.5)]
# Stereo width of the open air: (frequency [Hz], side minus mid [dB])
AIR_WIDTH = [(60, -15), (110, -18), (200, -5), (380, -5.5), (700, -2), (1290, 4.5), (2380, -1.5),
             (4400, 1.5), (8120, 0), (15000, 0)]


def air(base_db=-65):
    """Distant outdoor hush with a low rumble; the breeze buffets each microphone port on its own."""
    hush = stereo(*(ring(rng.standard_normal(N), gains(AIR_COLOUR)) for _ in range(2)), AIR_WIDTH)
    low, high = split(hush * undb(base_db) / band(hush, 221, 8000).std(), 148)
    rumble = band(low, 22, 270) * undb(-8.0 + 2 * walk(12.0))
    buffet = band(rng.standard_normal((2, N)), 25, 69)
    return rumble + high * undb(5.0 + walk(3.6)) + buffet / buffet.std() * breeze()


# Gusts on the microphone ports: (time [s], level [dB], half length [s])
WIND_GUSTS = [(0.568, -47, 0.22), (1.183, -39, 0.013)]


def breeze(calm_db=-73):
    """Strength of the wind on the ports: brief gusts over near calm."""
    return undb(calm_db) + sum(undb(db) * np.exp(-((TIME - s) / half_s) ** 2) for s, db, half_s in WIND_GUSTS)


def undb(db):
    """Decibels to gain."""
    return 10 ** (np.asarray(db) / 20)


def gains(points):
    """Gain at every frequency from (Hz, dB) points."""
    hz, db = np.transpose(points)
    return undb(np.interp(np.log(FREQ), np.log(hz), db))


def body(colour, modes, between_db):
    """Gain of a plastic shell: resonances standing over a broad colour."""
    power = sum(undb(db) ** 2 / (1 + ((FREQ - hz) / width) ** 2 * 2) ** 2 for hz, width, db in modes)
    return np.sqrt(power + (undb(between_db) * gains(colour)) ** 2)


def ring(x, gain):
    """Causal minimum-phase filter with the given gain, so that resonances ring after each blow."""
    cepstrum = irfft(np.log(gain + 1e-7))
    cepstrum[1:TAPS // 2] *= 2
    cepstrum[TAPS // 2 + 1:] = 0
    return signal.oaconvolve(x, irfft(np.exp(rfft(cepstrum))))[:len(x)]


def band(x, lo_hz, hi_hz):
    """Band-pass."""
    edges = [lo_hz, min(hi_hz, SR / 2 - 100)]
    return signal.sosfilt(signal.butter(3, edges, "band", fs=SR, output="sos"), x)


def split(x, hz):
    """The parts below and above a frequency; they add up to the whole."""
    low = signal.sosfiltfilt(signal.butter(2, hz, fs=SR, output="sos"), x)
    return low, x - low


def walk(rate):
    """Smooth chance with spread 1, drawn anew at the given rate in Hz."""
    k = max(int(SR / rate), 1)
    x = uniform_filter1d(np.repeat(rng.standard_normal(N // k + 1), k), k)[:N]
    return x / x.std()


def stereo(mid, side, width):
    """Left and right from a shared and an opposed part."""
    return mid + LEFT_RIGHT * ring(side, gains(width))


def add(out, s, x):
    """Mix a short sound in at time s."""
    i = max(int(s * SR), 0)
    out[..., i:i + x.shape[-1]] += x[..., :N - i]


def curves(table):
    """The columns of a table of timed rows, one value per sample."""
    s, *columns = np.transpose(table)
    return [np.interp(TIME, s, c) for c in columns]


def ramp(start_s, length_s):
    """A straight rise from 0 to 1."""
    return np.clip((TIME - start_s) / max(length_s, 1e-3), 0, 1)


def stretches(table, edge_s=0.04):
    """A control that takes each row's value between its start and end, with soft edges."""
    half = edge_s / 2
    return sum(value * (ramp(a - half, edge_s) - ramp(b - half, edge_s)) for a, b, value in table)


def scene():
    """The truck's drive, buzz, blows and grit sound in the yard, over the open air."""
    truck = drive_train() + buzz() + jolts() + knocks() + grit()
    return yard(truck) + air()


def record(dry):
    """A steep low-pass cuts the top above 16.1 kHz."""
    return signal.sosfilt(signal.ellip(10, .2, 70, 16100, fs=SR, output="sos"), dry)


dry = scene()
out = record(dry)
materialize(out)
```